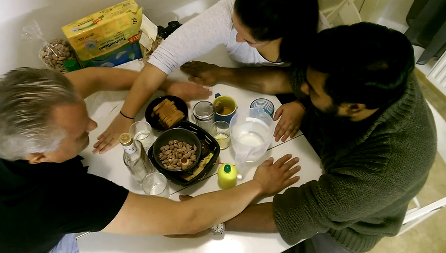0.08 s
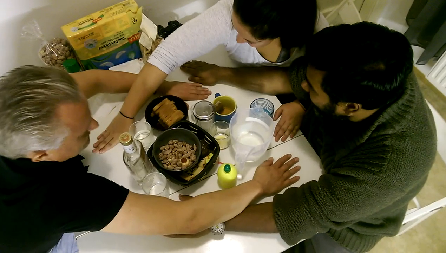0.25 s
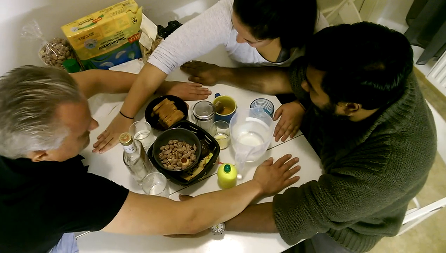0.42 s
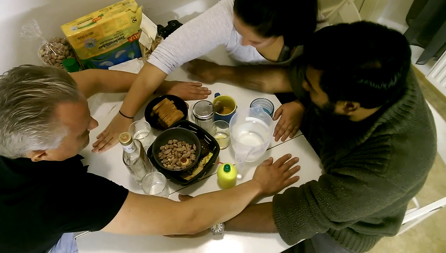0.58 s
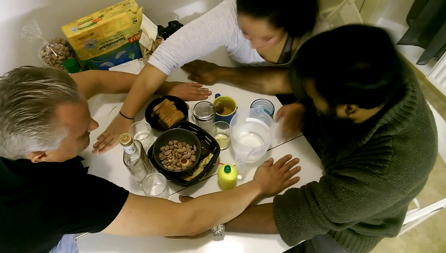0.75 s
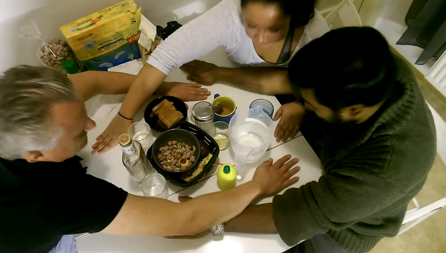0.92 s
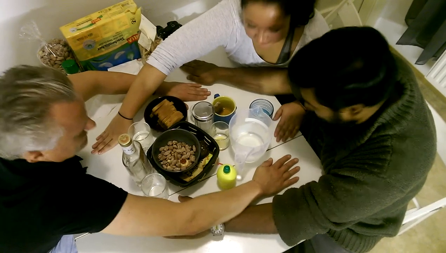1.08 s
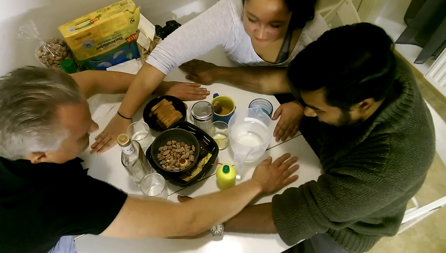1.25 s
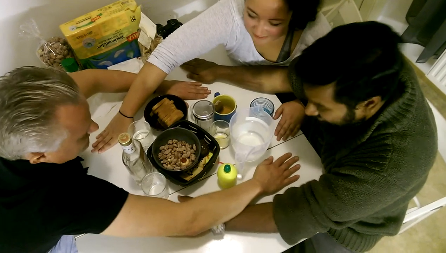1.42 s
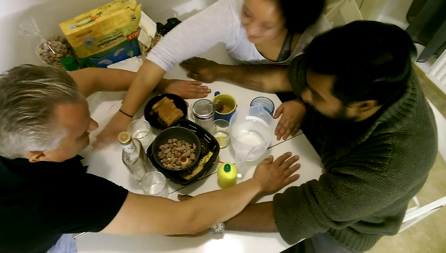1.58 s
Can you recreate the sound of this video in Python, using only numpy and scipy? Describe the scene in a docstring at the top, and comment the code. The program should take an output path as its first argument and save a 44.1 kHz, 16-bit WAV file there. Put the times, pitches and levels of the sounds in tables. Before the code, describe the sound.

Hands slap a kitchen table five times, with sharp smacks and a low boom.

```python
"""A small, hard-walled kitchen, one microphone within earshot of a laid table.
Hands slap the table five times; twice the fingers land before the palm. Each contact is a few
milliseconds of skin crack and a push that makes the top boom. Crockery rings faintly, a hand
grazes the top, and the room answers for half a second over a quiet hiss."""
import sys
import numpy as np
from scipy import signal
from scipy.fft import rfft, irfft, next_fast_len
from scipy.io import wavfile

SR = 44100
rng = np.random.default_rng(int(sys.argv[2]) if len(sys.argv) > 2 else 0)


def master_out(mix):
    """Clip the mix to full scale and print it as 16-bit PCM to the path in sys.argv[1]."""
    frames = np.transpose(np.atleast_2d(mix))
    ceiling = np.clip(frames, -1, 1)
    pcm = np.round(ceiling * 32767).astype(np.int16)
    wavfile.write(sys.argv[1], SR, pcm)


N = 72765
T = np.arange(N) / SR
FFT_SIZE = next_fast_len(2 * N)
BIN_HZ = np.maximum(np.arange(FFT_SIZE // 2 + 1) * SR / FFT_SIZE, 1)

# Reverberation time of the kitchen: frequency_hz, t60_s
ROOM_DECAY = [(100, 0.55), (210, 0.47), (560, .55), (1470, 0.46), (3880, 0.41), (7000, 0.33), (14000, 0.66)]


def undb(db):
    """Decibels to gain."""
    return 10 ** (np.asarray(db) / 20)


def read(points, hz):
    """Value of a (frequency_hz, value) table on a log-frequency axis."""
    frequencies, values = np.array(points, float).T
    return np.interp(np.log(hz), np.log(frequencies), values)


def per_half_octave(points):
    """Gain in dB that gives white noise the half-octave levels of a table."""
    return read(points, BIN_HZ) + 10 * np.log10(SR / np.log(2) / np.maximum(BIN_HZ, points[0][0]))


def fade(t60):
    """Exponential decay of 60 dB in t60 seconds."""
    return np.exp(-np.log(1000) * T / t60)


def delay(x, seconds):
    """The sound x, starting later."""
    return np.concatenate([np.zeros(int(seconds * SR)), x])[:N]


def shape(x, db):
    """Causal filter with a gain in dB at each of BIN_HZ."""
    cepstrum = irfft(np.log(undb(db)), FFT_SIZE)
    cepstrum[1:FFT_SIZE // 2] *= 2  # fold to minimum phase
    cepstrum[FFT_SIZE // 2 + 1:] = 0
    return irfft(rfft(x, FFT_SIZE) * np.exp(rfft(cepstrum)), FFT_SIZE)[:N]


def noise(low_hz, high_hz):
    """Noise between two soft edges, with rms 1."""
    band = signal.butter(2, [low_hz, high_hz], "band", fs=SR, output="sos")
    x = signal.sosfilt(band, rng.standard_normal(N))
    return x / x.std()


def ring(x, modes):
    """The signal x through an object's decaying modes."""
    response = sum(undb(db) * np.cos(2 * np.pi * hz * T) * fade(t60) for hz, db, t60 in modes)
    return signal.fftconvolve(x, response)[:N]


def reverberation(db):
    """Diffuse noise with the spectrum db, each band dying at the room's own rate."""
    spectrum = rfft(rng.standard_normal(FFT_SIZE)) * undb(db)
    tail = np.zeros(N)
    for centre_hz, t60 in ROOM_DECAY:
        band = read([(hz, hz == centre_hz) for hz, _ in ROOM_DECAY], BIN_HZ)
        tail += irfft(spectrum * band, FFT_SIZE)[:N] * fade(t60)
    return tail


def room_tone():
    """Quiet hiss, a thin electrical whine and a faint reverberation dying away at the start."""
    # Noise floor and dying tail: frequency_hz, half_octave_level_db
    hiss_levels = [(40, -100.5), (70, -81.5), (115, -71.5), (400, -82), (1200, -76), (2500, -80),
                   (5500, -75), (10000, -83.5), (16000, -73)]
    tail_levels = [(70, -77), (110, -64.5), (190, -60.5), (400, -64.5), (900, -76), (3000, -72),
                   (6000, -73.5), (10000, -105.5)]
    hiss = shape(rng.standard_normal(N), per_half_octave(hiss_levels))
    whine = undb(-72) * np.sin(2 * np.pi * 15000 * T)
    return hiss + reverberation(per_half_octave(tail_levels)) + whine


def ticks():
    """Faint bright ticks among the things on the table."""
    # Light contacts: start_s, level_db
    touches = [(0.12, -78), (1.358, -49.5)]
    return sum(undb(db) * delay(noise(3400, 5600) * fade(t60=0.099), start_s) for start_s, db in touches)


def table_boom():
    """The soft push of a hand sets the table top ringing."""
    # The top with its load: pitch_hz, relative_db, t60_s
    top_modes = [(108.3, -3.5, 0.77), (142.4, -10, 0.68), (159.6, 0, 0.52), (184.1, 2.5, 0.32),
                 (204.8, -6, 0.5), (246, -10.5, 0.95), (282, -22.5, 0.56), (318.7, -9.5, 0.36),
                 (423.7, -10, 0.44), (706, -10, 0.43), (797, -13.5, 0.2), (1040, -17.5, 0.23),
                 (1210, -15.5, 0.5), (1290, -13, .28)]
    push_ms, gain_db = 0.97, -14.5
    push = np.sin(np.pi * np.minimum(T * 1000 / push_ms, 1)) ** 2
    return undb(gain_db) * ring(push / push.sum(), top_modes)


def hand_spectrum(colour):
    """The colour of one contact in dB, falling away in the deep bass and above the crack."""
    # Bands of a contact's colour: frequency_hz
    bands_hz = [160, 350, 600, 1000, 1800, 2900, 4500, 14500]
    # Edges, against the 4.5 kHz and 160 Hz bands respectively: frequency_hz, relative_db
    treble_edge = [(6300, -1), (8000, -13), (10000, -20)]
    bass_edge = [(40, -25), (75, -34.5), (110, -9.5)]
    points = list(zip(bands_hz, colour))
    points += [(hz, colour[-2] + db) for hz, db in treble_edge]
    points += [(hz, colour[0] + db) for hz, db in bass_edge]
    return per_half_octave(sorted(points)) - 1.5


def ripple(depth_db=1.5, spacing_hz=70, full_above_hz=1000):
    """Chance peaks and dips in a contact's mids and treble, in dB."""
    chance = rng.standard_normal(1024)
    bumps = np.interp(BIN_HZ / spacing_hz, np.arange(len(chance)), chance)
    return depth_db * bumps * np.minimum(BIN_HZ / full_above_hz, 1)


def resonances(peaks, relative_width=0.053):
    """Clear peaks of the hand and the spot it hits, in dB."""
    return sum(db / (1 + ((BIN_HZ / hz - 1) / relative_width) ** 2) for hz, db in peaks)


def skin_crack(length_ms, db, grain=0.59):
    """A short, grainy burst as skin meets the top and air is squeezed out."""
    age = T * 1000 / length_ms
    envelope = np.minimum(age / 0.13, 1) * np.exp(-age ** 2 + grain * rng.standard_normal(N))
    phase = np.angle(rfft(rng.standard_normal(N) * envelope, FFT_SIZE))
    whitened = irfft(np.exp(1j * phase), FFT_SIZE)[:N]
    burst = whitened * np.exp(-(age / 2) ** 2)
    return shape(burst / np.sqrt(np.sum(burst ** 2)), db)


def reflections(db, lag_s=0.0022, build_s=0.0015):
    """The near walls' dense answer reaches the microphone just behind the direct sound."""
    # Tone of the room against the direct sound: frequency_hz, relative_db
    room_colour = [(100, 6), (400, 1.5), (1500, 2), (5000, -2), (14000, -11)]
    # A longer tail spreads the same energy more thinly.
    spread_db = 10 * np.log10(2 * np.log(1000) / (SR * read(ROOM_DECAY, BIN_HZ)))
    tail = reverberation(db + read(room_colour, BIN_HZ) + spread_db)
    return delay(tail * (1 - np.exp(-T / build_s)), lag_s)


def slaps():
    """Each contact gives a crack, its reflections and a boom of the table."""
    # Fingers and palms landing: start_s, length_ms, push_db, room_db,
    # peaks as (pitch_hz, boost_db), colour_db for each band of hand_spectrum
    contacts = [ (.1992, 6.4, -17, 6, [(1650, 21.5), (4250, 8.5)],
                [-5.5, -14, -3.5, -10, -6.5, -8, -6, -12.5]), (.2060, 6.4, -3.5, 2.5, [(780, 9), (1620, 5),
                (2200, 11.5), (4150, 1.5)], [11.5, 0.5, -0.5, 8.5, 1.5, -7, -7.5, -31]),
                (0.5446, 4.1, -14, 4, [(930, 13.5), (2130, 10.5)],
                [-2.5, -7, -5, -6.5, -10.5, -14, -10.5, -15.5]), (0.7973, 5, -29.5, 1.5, [(990, 11),
                (2550, 4), (4300, 11), (5250, 5.5)], [-17, -10.5, -11.5, -3.5, -7.5, -10, -4.5, -17.5]),
                (1.2002, 11, -21.5, 3, [(1750, 19), (2320, 17.5)],
                [-7.5, -20.5, -21, -13, -14, -14.5, -14, -15]), (1.2160, 12.3, -12.5, 6.5, [(1180, 10),
                (1750, 5), (3600, 9.5)], [-11.5, -8, -8, -3, -4.5, -11, -15, -74]),
                (1.436, 4.6, -20.5, 2.5, [(1350, 12.5), (3550, 12)],
                [-4, -8, -12.5, -15.5, -13, -13.5, -12, -21]), ]
    push_lead_s = 0.00204  # the flesh loads the top just before it cracks
    room_peak_share = 0.4  # reflections come from all sides, so the peaks stand out less
    out, boom = np.zeros(N), table_boom()
    for start_s, length_ms, push_db, room_db, peaks, colour in contacts:
        spectrum_db = hand_spectrum(colour) + ripple()
        peaks_db = resonances(peaks)
        crack = skin_crack(length_ms, spectrum_db + peaks_db)
        room = reflections(spectrum_db + room_db + room_peak_share * peaks_db)
        out += delay(crack + room, start_s)
        out += undb(push_db) * delay(boom, start_s - push_lead_s)
    return out


def dishes():
    """Jolted crockery rings faintly, its ring diffused by the room."""
    # Dishes and glasses: pitch_hz, relative_db, t60_s
    crockery_modes = [(3360, -8.5, .3), (3340, 1.5, 0.42), (3600, -6, 0.2), (3840, -6, 0.21),
                      (3930, -5.5, 0.16), (4350, -10, 0.13), (4370, -17, .3), (5500, -5, 0.1)]
    # Jolts through the table: start_s, gain_db
    jolts = [(0.798, -49), (1.44, -41.5)]
    out = np.zeros(N)
    for start_s, db in jolts:
        scatter = rng.standard_normal(N) * fade(t60=0.15)
        scatter /= np.sqrt(np.sum(scatter ** 2))
        out += undb(db) * delay(ring(scatter, crockery_modes), start_s)
    return out


def hand_brush():
    """A brief dull swish of skin on the top."""
    # A grazing hand: start_s, length_s, level_db
    grazes = [(1.18, 0.055, -52.5)]
    return sum(undb(db) * delay(noise(220, 1940) * (T < length_s), start_s)
               for start_s, length_s, db in grazes)


def scene():
    """The table and the room at one microphone."""
    return (slaps() + dishes() + hand_brush() + ticks() + room_tone())[None]


def record(dry):
    """The recorder cuts the deep bass, clips at full scale and cuts the top."""
    low_cut = signal.butter(4, 66, "high", fs=SR, output="sos")
    high_cut = signal.ellip(8, 0.2, 70, 17300, fs=SR, output="sos")
    clipped = np.clip(signal.sosfilt(low_cut, dry), -1, 1)
    return signal.sosfilt(high_cut, clipped)


dry = scene()
out = record(dry)
master_out(out)
```